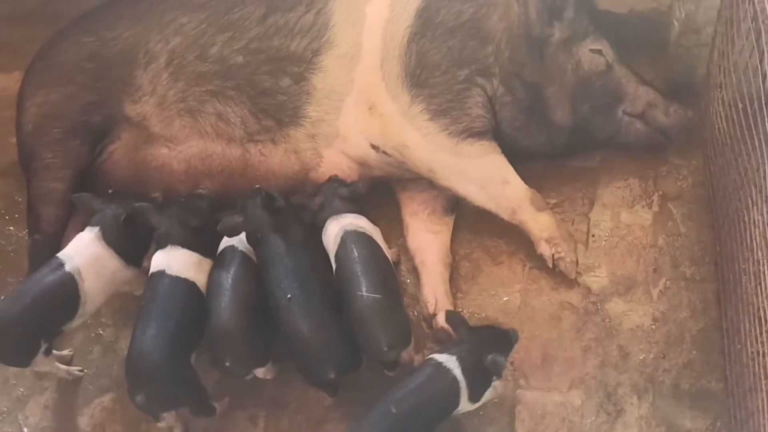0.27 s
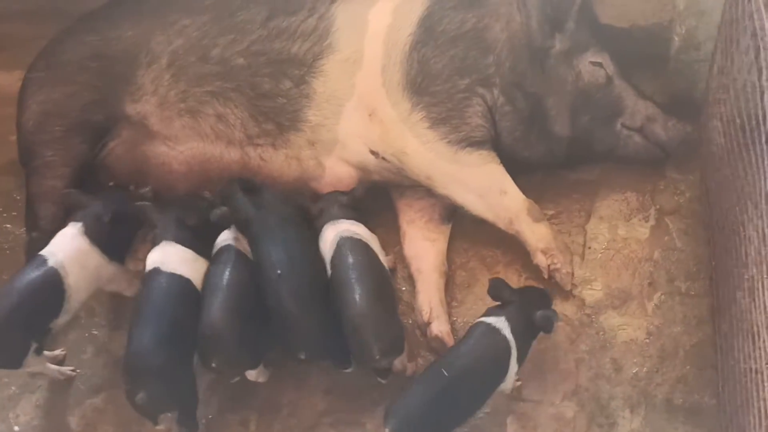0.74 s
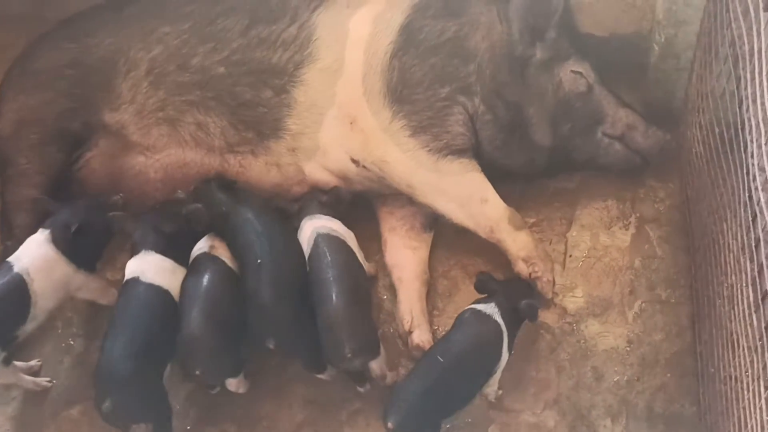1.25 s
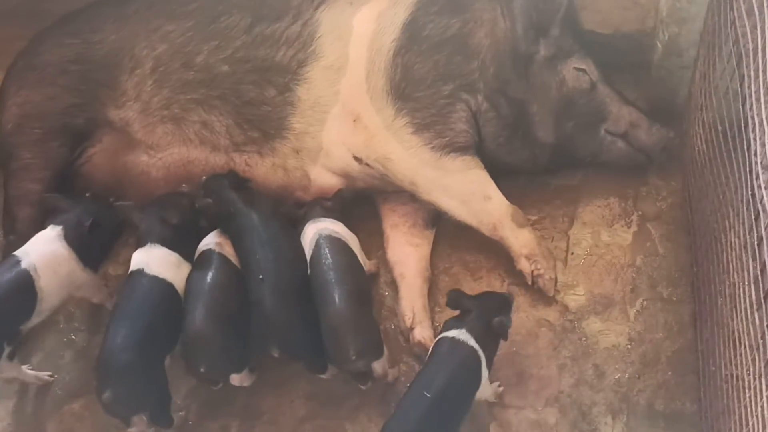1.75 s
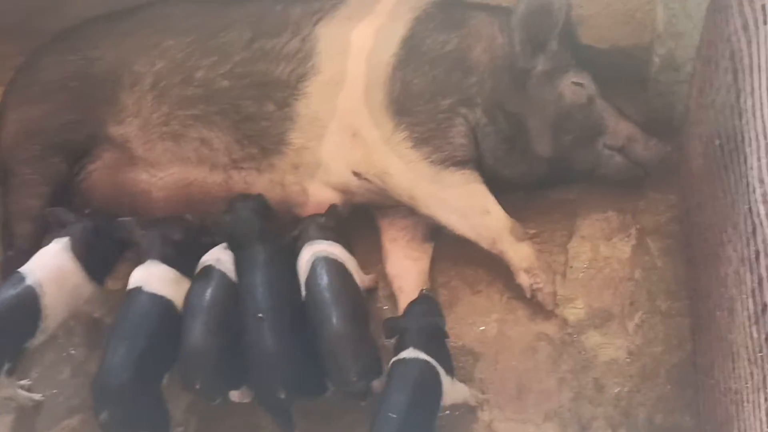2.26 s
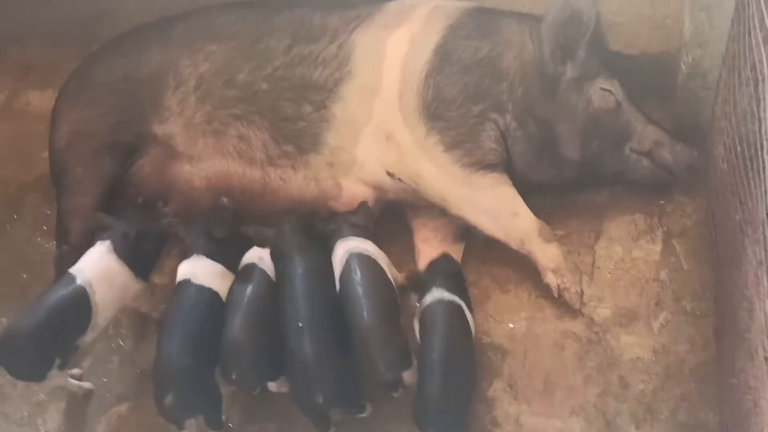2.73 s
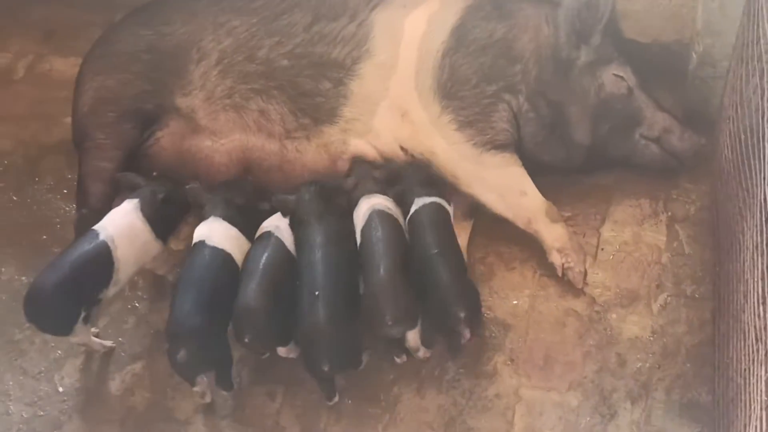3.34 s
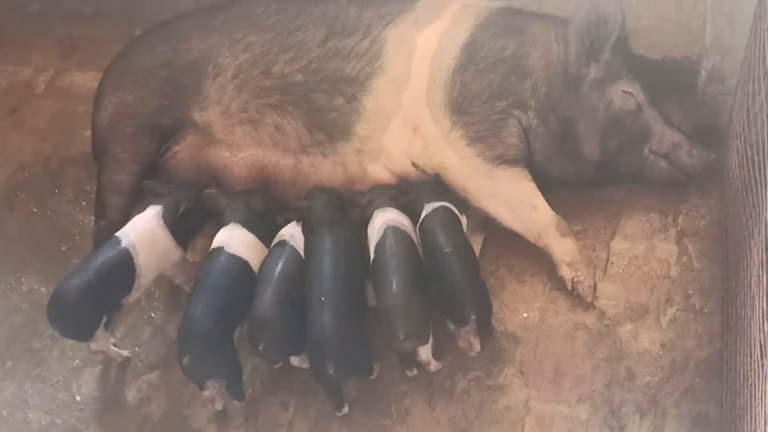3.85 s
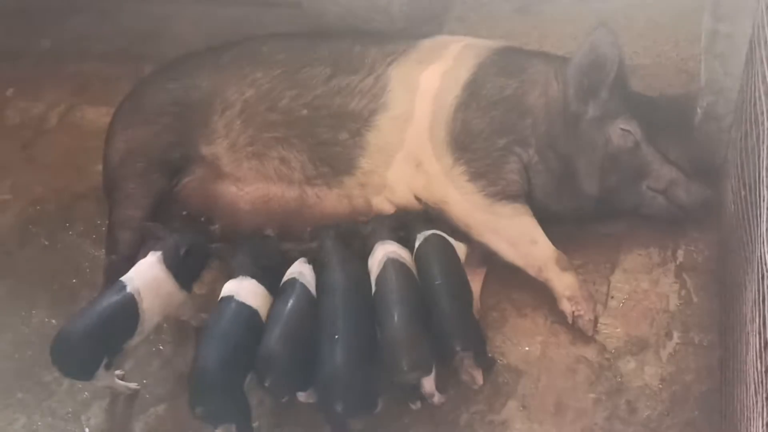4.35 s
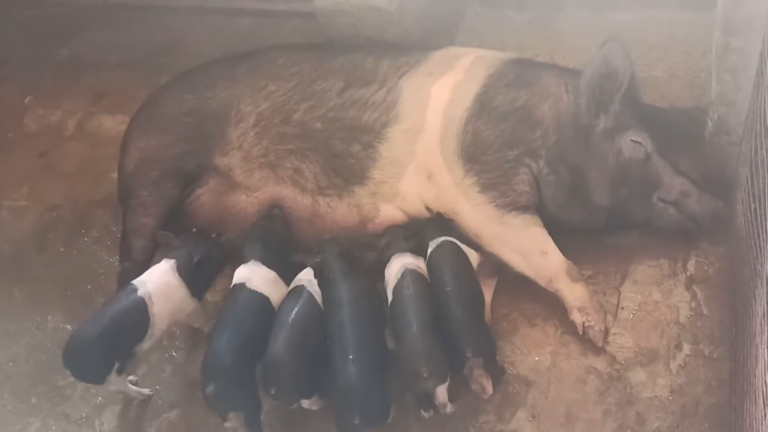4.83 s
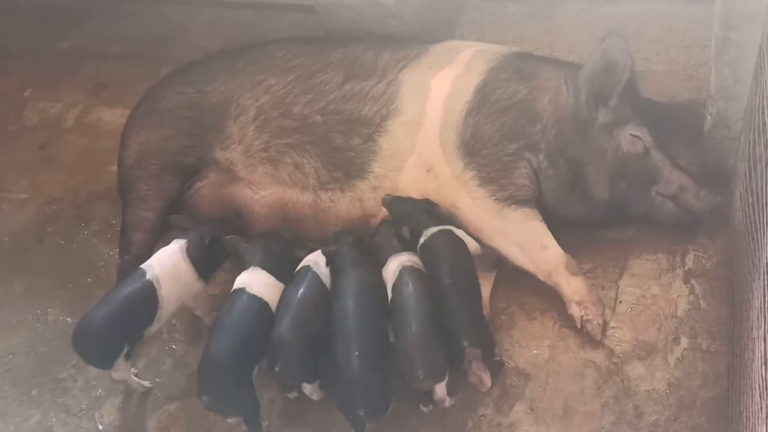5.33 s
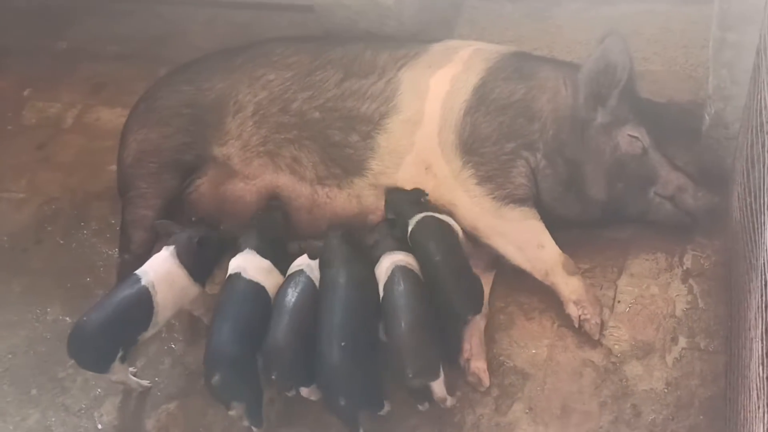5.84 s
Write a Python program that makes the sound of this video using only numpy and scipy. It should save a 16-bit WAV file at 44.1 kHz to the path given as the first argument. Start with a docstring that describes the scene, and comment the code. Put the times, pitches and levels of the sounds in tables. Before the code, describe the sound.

Close, single-channel sound of a big pig grunting in a small, reflective pen. Each loud grunt is a brief string of slow, wet throat slaps with mouth clicks. In between she rumbles through a nearly shut mouth, with hissing snout air, one quick snort and a long hum carrying a thin tone. Beneath lie faint sucking, ticking, body rustle and still, low barn air.

```python
"""A sow nurses her piglets in a hard-walled pen, where the litter fizzes and shuffles in still air throughout.
She starts with a soft hum; a hoarse moan leads into a loud grunt at 0.8 s, a slow rattle of throat slaps.
A faint grunt, short knocks and one flapping snort at 1.4 s follow, then a second loud grunt at 2.8 s.
On her loudest murmur, a nasal hum from 3.3 s, rides a thin, nearly steady tone; loud grunts return at 4.4
and 5.8 s. Between grunts she rumbles through nose and mouth, air hisses in her snout and the walls echo her."""
import sys
import numpy as np
from scipy import signal
from scipy.fft import rfft, irfft, next_fast_len
from scipy.io import wavfile
from scipy.ndimage import uniform_filter1d, minimum_filter1d, map_coordinates

SR = 44100
rng = np.random.default_rng(int(sys.argv[2]) if len(sys.argv) > 2 else 0)


def file_out(sig):
    """Save sig as 16-bit WAV at sys.argv[1]."""
    # one column per channel
    cols = np.atleast_2d(sig).T
    # limit, then scale
    lim = np.clip(cols, -1, 1)
    pcm = np.round(lim * 32767).astype(np.int16)
    wavfile.write(sys.argv[1], SR, pcm)


N = 268172
TIME = np.arange(N) / SR

# In resonance tables the width is that at half amplitude.
# Open grunts: first slap t/s, first period/s, period change per slap/s, level before make-up/dB, time to crest/s,
# crest to -6 dB/s, jaw gain/dB, tongue gain/dB, spray/dB, dull above f/Hz
GRUNT_EVENTS = [(0.822, 0.03, -0.0065, -13, 0.02, 0.024, 6, -2.5, 1.5, 9200),
                (1.0536, 0.029, 0.001, -27.5, 0.0059, 0.034, 0.5, -5.5, 2, 2970),
                (2.844, 0.031, 0.0005, -15, 0.03, 0.046, 5, -0.5, -0.5, 8420),
                (4.4321, 0.034, -0.0076, -16.5, 0.034, 0.033, 3, -7, -2, 8800),
                (5.7812, 0.0324, -0.0018, -14.5, 0.054, 0.057, -4.5, -1, -1.5, 7520)]
SLAP_MAKEUP_DB = 36.5  # offsets the spread of a slap over the throat's resonances
# Open throat: f/Hz, width/Hz, level/dB
THROAT_MODES = [(119, 75, -5), (254, 52, 2), (348.8, 83, 1), (532, 160, -3.5), (625, 136, -4),
                (1093, 140, -14), (1211, 130, -7.5), (1525, 120, -14.5), (2180, 190, -14),
                (2430, 680, -26.5), (3580, 1020, -20), (4050, 730, -61), (7070, 920, -28)]
THROAT_SHIFT = 0.032  # random spread of each resonance from slap to slap (share)
JAW_HZ = 627  # resonance set by the jaw opening
TONGUE_HZ, TONGUE_WIDTH_HZ = 1130, 660  # band damped by the tongue
FIRST_DULL_HZ = 4370  # treble limit of a first slap, with the mouth barely open
BULGE_S, BULGE_DB = .0037, -8.5  # soft low push of the folds: its lead over the slap and its level
# Colours of the three parts of a slap: f/Hz, level/dB
BULGE_COLOUR = [(400, 3.0), (700, -4.5), (1400, -60), (4000, -80)]
THUMP_COLOUR = [(600, 4.0), (1200, 0.5), (2200, -11.0), (4000, -48), (7000, -6)]
SPRAY_COLOUR = [(300, -10.5), (1000, 6.0), (2500, 8.5), (7500, -1.5)]
WALL_GLINT_S, WALL_GLINT_DB = .0205, -15.5  # bright wall echo of each slap: delay and level
# Bright wall echo: f/Hz, width/Hz, level/dB
WALL_GLINT_MODES = [(3840, 710, 2)]
RASP_DB, RASP_LAG_S = -24.5, 0.0028  # air under a grunt, trailing its effort
# Throat air: f/Hz, level/dB
RASP_COLOUR = [(300, -28), (900, 4), (1400, 7.5), (2400, -7.5), (4000, -8.5), (5200, -13.5), (8000, -29.5)]
# Early returns of each slap from floor and near wall: delay/s, level/dB
NEAR_BOUNCES = [(.0029, -20), (.0078, -32)]

# Wet clicks in the open mouth: t/s, peak before treble loss/dB, f/Hz
CLICK_EVENTS = [(0.856, -22, 6530), (1.061, -41.5, 6550), (2.8474, -31, 6900), (2.877, -31, 6600),
                (2.9085, -34, 6540), (2.9392, -31, 6370), (4.468, -34, 6870), (4.5006, -35.5, 5930),
                (5.8153, -36.5, 6580), (5.8457, -35.5, 6370), (5.901, -33.5, 6300)]
CLICK_WIDTH_HZ, CLICK_TOP_HZ = 830, 7940  # the mouth lets out little above the top

# Closed-mouth grunts: start t/s, rise/s, length/s, crest level before trims/dB, fade while held/dB,
# mouth over nose/dB, snout air over nose/dB, crest pitch f/Hz, voiced share at crest (0-1), lips parted (0-1)
MURMUR_EVENTS = [(0.527, 0.23, 0.34, -37, -3.5, -13, -17, 64.85, 0.7, 0.57),
                 (0.966, 0.1, 0.26, -47, 5, -0.5, -5.5, 66.38, 0.44, 0.6),
                 (1.615, 0.064, 0.33, -40, 15, -13, -9, 67.86, 0.4, 0.74),
                 (2.23, 0.23, 0.45, -54.5, 9, -10.5, -16, 61.27, 0.28, 0.3),
                 (2.71, 0.035, 0.088, -32.5, 6.5, -7, -29, 64.13, 0.99, 0.27),
                 (2.786, 0.077, 0.084, -37.5, 0.5, -0.5, -2.5, 63.49, 0.5, 0.8),
                 (2.977, 0.041, 0.23, -40.5, 4.5, -3.5, -7.5, 62.12, 0.1, 0.18),
                 (3.155, 0.022, 0.047, -36.5, 7.5, -20, -37, 62.35, 0.5, 0.17),
                 (3.272, .075, .37, -18.5, 18.5, -21.5, -20.5, 65, 0.9, .3),
                 (3.628, 0.09, 0.27, -37, -0.5, -11.5, -26, 59.5, 0.1, 0.15),
                 (3.922, 0.044, 0.28, -43.5, 3.5, -10, -8.5, 60.88, 0.6, 0.2),
                 (4.323, 0.012, 0.084, -51.5, 3, -1.5, 2.5, 61.28, 0.34, 0.3),
                 (4.404, 0.028, 0.036, -40.5, 0.5, 0, -11, 60.78, 0.1, 0),
                 (4.622, 0.15, 0.25, -42, 3, -9, -12.5, 61.21, 0.46, 0),
                 (4.821, 0.041, 0.045, -36, 0.5, -25, -34, 60.87, 0.98, 0),
                 (4.945, 0.047, 0.12, -32.5, 0, -8.5, -14.5, 51.78, 0.68, 0.74),
                 (5.014, 0.054, 0.18, -24, 13, -16.5, -16, 52.88, 0.73, 0.9),
                 (5.178, 0.039, 0.39, -39, 10, -12, -15, 60.18, 0.26, 0.24),
                 (5.672, 0.015, 0.097, -35.5, 4, -8.5, -14.5, 61.03, 0, 0.14),
                 (5.757, 0.022, 0.037, -34.5, 0, -2, -18, 60.87, 0.5, 0.8),
                 (5.958, 0.047, .13, -44, 6.5, 5.5, -5, 63.46, 0.09, 0)]
NOSE_DB, MOUTH_DB, AIR_DB, HUM_DB = -2.5, -4.5, -4, -5  # trims
SWELL_SHAPE = 0.56  # above .5, a push starts gently
FADE_SHAPE = 0.703  # below 1, effort falls fastest just after the crest
RELEASE_DB_PER_S = 259.5  # how fast a push dies once released
NOSE_LAG, AIR_LEAD = 1.1, 0.65  # powers of the swell: voice builds later than air
MOUTH_FOLLOWS, AIR_FOLLOWS = 0.62, 1.3  # dB lost per dB of fading effort
VOICE_FOLLOWS = .15  # power of effort that thins the voiced share
PITCH_PER_DB = .0012  # log pitch per dB of effort
PITCH_WAVER, HUM_WAVER_DB = .016, 1.8
TREMOR_DB, TREMOR_HZ = 1.4, 22
# Hum partials: multiple of the pitch, level/dB
HUM_PARTIALS = [(2, -7), (3, 1.5), (4, 1), (5, -6.5), (6, -21)]
# Airways: f/Hz, width/Hz, level/dB
NOSE_MODES = [(145.5, 16.6, -4.5), (180.9, 30, 1), (243, 69, -3), (336.5, 45, -7), (416, 90, -18.5)]
MOUTH_MODES = [(469, 167, 9.5), (640, 580, -1.5), (714, 69, -8)]
PARTED_LIP_MODES = [(602, 200, 1), (716, 170, -0.5)]
SNOUT_MODES = [(850, 790, 2.5), (1410, 450, -6), (1700, 940, 5.5), (2280, 530, -5.5), (2920, 660, 1.5),
               (3760, 1500, -4), (4730, 1200, -8), (6700, 2000, -17)]
NOSTRIL_MODES = [(1470, 400, -2.5), (1700, 110, 2), (2595, 410, 5)]
# Chest wall: f/Hz, width/Hz, level/dB
CHEST_MODES = [(44.8, 3.2, -9), (77.5, 53, -7), (131.7, 23, -5.5)]
CHEST_DB, CHEST_AT_DB, CHEST_FOLLOWS = -48, -40, 0.81  # rumble at this nose level; it grows less than the voice
CHEST_CLEAN_DB = -7  # a clean hum shakes the chest less

# A hoarse moan before the first grunt, then a thin, nearly steady tone on the loudest murmur, each a list of
# points: t/s, f/Hz, level/dB, overtone level/dB
TONE_PATHS = [
    [(.56, 359.4, -56.5, -76), (0.611, 385.7, -47.5, -66), (0.659, 405, -45, -66), (.72, 400.5, -54, -54),
     (.8, 382, -51, -50)],
    [(3.49, 336, -54, -71), (3.54, 340.2, -39, -65), (3.61, 336.3, -45, -65), (3.72, 334.2, -52.5, -74)],
]
# Nostril air: start t/s, rise/s, length/s, whistle level/dB, hiss over whistle/dB
WHEEZE_EVENTS = [(0.546, 0.045, 0.36, -55, 2), (1.035, 0.027, 0.1, -51, -6), (3.265, 0.071, 0.075, -52, 11),
                 (3.528, 0.35, 0.41, -53.5, 4), (4.983, 0.06, 0.077, -56, 2), (5.254, 0.19, 0.4, -72, 8)]
WHEEZE_FADE_DB = 2.5  # sag within a wheeze
WHEEZE_GRAIN_DB, WHEEZE_GRAIN_HZ = 4, 119.6  # moisture breaks up the hiss
# Snort: t/s, throat level before trim/dB, rasp level before trim/dB
SNORT_CURVE = [(1.365, -51, -53), (1.385, -42.5, -54), (1.42, -41.5, -59), (1.455, -38, -36.5),
               (1.49, -39.5, -33), (1.56, -46, -50), (1.64, -54, -45.5)]
# Soft palate and throat: f/Hz, width/Hz, level/dB
PALATE_MODES = [(141, 140, -2.5), (347, 47, 8), (451.7, 180, -2.5), (670, 160, 2.5), (1226, 49, -5),
                (1880, 310, -10), (2860, 430, -16), (3870, 1200, -45)]
# Short throat slaps, knocks and smacks: t/s, peak level/dB, f/Hz, width/Hz
KNOCK_EVENTS = [(1.028, -27.5, 483, 262), (1.055, -33.5, 2370, 645), (1.087, -38, 2520, 700),
                (1.281, -42.5, 3130, 1816), (1.367, -36, 1820, 600), (1.402, -38, 1580, 900),
                (1.4428, -32, 2012, 700), (2.04, -43, 3010, 380), (2.322, -45, 4260, 3000),
                (2.722, -45, 613, 500), (3.0435, -38, 5137, 2030), (4.3313, -57, 1528, 1516),
                (4.5648, -51.5, 1596, 880), (5.683, -36.5, 1500, 1810)]

# Busyness of the litter: t/s, level before LITTER_DB/dB
LITTER_CURVE = [(0.0, -77), (0.66, -78), (0.81, -67), (1.29, -71.5), (2.12, -77.5), (3.12, -72),
                (4.01, -68.5), (4.21, -76), (5.27, -68.5), (5.62, -67), (5.75, -73.5), (6.08, -66.5)]
LITTER_DB, RESTLESS_DB, RESTLESS_HZ = 10.5, .9, 6.7  # lift, and its restless wavering
# Piglets shove or scuff the floor: t/s, fall/s, level/dB
SHUFFLE_EVENTS = [(0.624, 0.093, -50.5), (1.057, 0.24, -52), (1.376, 0.16, -56), (1.587, 0.18, -55),
                  (2.161, 0.47, -61.5), (2.72, 0.096, -51), (2.859, 0.21, -55), (3.037, 0.15, -53.5),
                  (3.21, 0.087, -54), (3.612, 0.2, -53.5), (4.071, 0.12, -55.5), (5.166, 0.37, -59.5)]
SHUFFLE_RISE = 0.23  # rise as a share of the fall time
# Litter fizz: f/Hz, level/dB
FIZZ_COLOUR = [(700, 1), (2000, 0), (4800, 8), (7000, 4), (8500, -0.5), (10800, -8.5), (13700, 4),
               (15500, -5)]
# Bodies rubbing on sow and floor: f/Hz, level/dB
RUSTLE_COLOUR = [(200, -19), (450, 6.5), (900, 0.5), (1600, -4.5), (2700, -7), (5000, -15.5)]
RUSTLE_DB = -0.5  # relative to the busy fizz
# Wet sucks: t/s, level/dB, time to fall 60 dB/s
SUCK_EVENTS = [(.637, -46, .15), (1.375, -46.5, 0.96), (1.43, -54, 0.17), (2.725, -84, .2),
               (4.965, -46, 0.27), (5.784, -39, 0.096)]
# Sucked air: f/Hz, level/dB
SUCK_SPECTRUM = [(2000, -12), (5000, -17), (10000, -6.5), (13800, 1.5), (15500, 8)]

# Still barn air: f/Hz, level/dB
BARN_COLOUR = [(15, -25), (25, 6.5), (136, -5), (173, -0.5), (204, 1.5), (274, -5.5), (600, -9.5),
               (1050, -17), (1660, -19.5), (2700, -18.5), (5010, -25.5), (15500, -64)]
# Faint far tone: t/s, level/dB
WHINE_CURVE = [(0, -73), (.3, -71.5), (1.9, -67), (2.6, -71.5), (3.0, -85)]
# Pen reverberation: f/Hz, time to fall 60 dB/s
PEN_DECAY = [(100, 1), (260, 0.5), (700, 0.37), (1800, 0.53), (4800, 0.39), (12000, 0.19)]
LIMIT_DB, LIMIT_S = -8.8, .004
TOP_HZ = 15600  # band limit


def grunts(count=5):
    """Throat slaps swell and fade, each with a bright wall echo; harder ones throw more spray over rasping air."""
    k = np.arange(count)
    slaps, glint, flow = np.zeros((3, N))
    for start, period, change, db, crest, half, jaw_db, tongue_db, spray_db, dull_hz in GRUNT_EVENTS:

        def effort_db(t):
            return -6 * ((t - start - crest) / half) ** 2

        def mouth_gain(hz, edge_hz):
            jaw = jaw_db * np.exp(-((hz - JAW_HZ) / 90) ** 2)
            tongue = tongue_db * np.exp(-((hz - TONGUE_HZ) / TONGUE_WIDTH_HZ) ** 2)
            return amp(jaw + tongue) / (1 + (hz / edge_hz) ** 8)

        for t in start + k * period + change * k * (k - 1) / 2:
            edge_hz = dull_hz if t > start else min(dull_hz, FIRST_DULL_HZ)
            mouth = lambda hz: mouth_gain(hz, edge_hz)
            size = amp(db + effort_db(t))
            add(slaps, t - BULGE_S, size * slap(spray_db + 0.14 * effort_db(t), mouth))
            echo = tract(burst(decay=0.001, rise=0.00046), WALL_GLINT_MODES)
            add(glint, t + WALL_GLINT_S, size * shaped(echo / np.abs(echo).max(), mouth))
        flow += amp(db + 2.1 * effort_db(TIME - RASP_LAG_S))
    near = slaps + sum(amp(db) * np.interp(TIME - delay, TIME, slaps, left=0) for delay, db in NEAR_BOUNCES)
    grain = amp(4 * wobble(250))
    rasp = amp(RASP_DB) * flow * unit(coloured(rng.standard_normal(N) * grain, RASP_COLOUR))
    throat = pen(amp(SLAP_MAKEUP_DB) * near + rasp, wet_db=-4.0, wall_db=-9.5)
    return throat + pen(amp(WALL_GLINT_DB) * glint, wet_db=-5, wall_db=-8)


def slap(spray_db, mouth):
    """One throat beat: a low bulge, a thump and a wet spray, in resonances that shift from beat to beat."""
    impulse = signal.unit_impulse(SR // 10)
    bulge = amp(BULGE_DB) * coloured(impulse, BULGE_COLOUR)
    thump = coloured(impulse, THUMP_COLOUR)
    spray = amp(spray_db) * coloured(burst(decay=.005, rise=.0015), SPRAY_COLOUR)
    voice = bulge + np.pad(thump + spray, (round(BULGE_S * SR), 0))[:len(bulge)]
    modes = [(hz * np.exp(THROAT_SHIFT * rng.standard_normal()), width, db) for hz, width, db in THROAT_MODES]
    return tract(shaped(voice, mouth), modes)


def clicks():
    """Wet tissue snaps apart in her mouth: a tiny burst rings a bright resonance."""
    out = np.zeros(N)
    for s, db, hz in CLICK_EVENTS:
        snap = tract(burst(decay=0.00076, rise=0.00018), [(hz, CLICK_WIDTH_HZ, 0)])
        add(out, s, amp(db) * snap / np.abs(snap).max())
    return pen(shaped(out, lambda hz: 1 / (1 + (hz / CLICK_TOP_HZ) ** 20)), wet_db=-6, wall_db=-7)


def murmurs():
    """With her mouth nearly shut she hums and rumbles through her nose; the same beats chop the snout air."""
    nose_gain, mouth_gain, air_gain, pitch, voiced, parted = murmur_controls()
    pitch_hz = pitch * np.exp(PITCH_WAVER * wobble(30))
    phase = 2 * np.pi * np.cumsum(pitch_hz) / SR
    hum = unit(sum(amp(db + HUM_WAVER_DB * wobble(22)) * np.cos(k * phase) for k, db in HUM_PARTIALS))
    beats = flutter(pitch_hz, jitter=0.1887, scatter_db=2.0)
    rumble = beats + 0.72 * puffs(beats, decay=0.021, rise=0.0024)
    nose = nose_gain * np.sqrt(1 - voiced ** 2) * unit(tract(rumble, NOSE_MODES))

    chest_gain = (nose_gain / amp(CHEST_AT_DB)) ** CHEST_FOLLOWS * amp(CHEST_CLEAN_DB * voiced ** 2)
    chest = chest_gain * unit(tract(rumble, CHEST_MODES))

    chopped = .5 * beats + puffs(beats, decay=0.021, rise=0.0014)
    closed_lips = unit(tract(chopped, MOUTH_MODES))
    open_lips = unit(tract(chopped, PARTED_LIP_MODES))
    mouth = mouth_gain * unit((1 - parted) * closed_lips + parted * open_lips)

    hiss = puffs(beats, decay=0.016, rise=0.0055)
    # a very faint nostril colour lies under the snout hiss
    air = air_gain * unit(unit(tract(hiss, SNOUT_MODES)) + amp(-41.0) * unit(tract(hiss, NOSTRIL_MODES)))

    voice = amp(NOSE_DB) * nose + amp(CHEST_DB) * chest + amp(MOUTH_DB) * mouth + amp(AIR_DB) * air
    tremor = amp(TREMOR_DB * wobble(TREMOR_HZ))
    clean = amp(HUM_DB) * nose_gain * voiced * hum
    return pen(tremor * voice, wet_db=-8.5, wall_db=-16.0) + pen(tremor * clean, wet_db=-8.5, wall_db=-25)


def murmur_controls():
    """Effort drives nose, mouth and snout levels, the pitch and the hummed share; overlaps blend by power."""
    nose, mouth, air, pitch, voiced, parted = np.zeros((6, N))
    for start, rise, length, db, fade_db, mouth_db, air_db, hz, share, lips in MURMUR_EVENTS:
        gate, effort = push(start, rise, length, fade_db)
        power = (amp(db) * gate ** NOSE_LAG * effort) ** 2 + 1e-16
        nose += power
        mouth += (amp(db + mouth_db) * gate * effort ** MOUTH_FOLLOWS) ** 2
        air += (amp(db + air_db) * gate ** AIR_LEAD * effort ** AIR_FOLLOWS) ** 2
        pitch += power * hz * np.exp(PITCH_PER_DB * 20 * np.log10(effort))
        voiced += power * share * effort ** VOICE_FOLLOWS
        parted += power * lips
    voiced, parted = np.clip(voiced / nose, 0, 1), np.clip(parted / nose, 0, 1)
    return np.sqrt(nose), np.sqrt(mouth), np.sqrt(air), pitch / nose, voiced, parted


def push(start, rise, length, fade_db):
    """One push of air: a gate that swells and is released, and the effort that fades while it is held."""
    t = TIME - start
    held = np.clip((t - rise) / max(length - rise, .005), 0, 1)
    gate = swell(start, rise) ** SWELL_SHAPE * amp(-RELEASE_DB_PER_S * np.clip(t - length, 0, 1))
    return gate, amp(-fade_db * held ** FADE_SHAPE)


def throat_tone(rows):
    """The throat sings a tone and its octave along a pitch path, with fast wavering of pitch and level."""
    s, pitch, db, overtone_db = np.transpose(rows)
    pitch_hz = np.interp(TIME, s, pitch) * np.exp(0.0297 * wobble(70))
    phase = 2 * np.pi * np.cumsum(pitch_hz) / SR
    low, high = gains(np.transpose([s, db, overtone_db]))
    return (low * unit(np.sin(phase)) + high * unit(np.sin(2 * phase))) * amp(2.7 * wobble(58))


def wheezes():
    """Unvoiced air half whistles in the nostril resonances, with a moist, grainy hiss from the snout."""
    whistle = unit(tract(rng.standard_normal(N), NOSTRIL_MODES))
    grain = amp(WHEEZE_GRAIN_DB * wobble(WHEEZE_GRAIN_HZ))
    hiss = unit(tract(rng.standard_normal(N) * grain, SNOUT_MODES))
    air = np.zeros(N)
    for start, rise, length, db, hiss_db in WHEEZE_EVENTS:
        gate, effort = push(start, rise, length, WHEEZE_FADE_DB)
        air += amp(db) * gate * effort * (whistle + amp(hiss_db) * hiss)
    return pen(air, wet_db=-9.0, wall_db=-9.5)


def snort():
    """The soft palate flaps fast and unevenly, letting out puffs that ring throat and snout."""
    throat_gain, rasp_gain = gains(SNORT_CURVE)
    beats = flutter(rate_hz=130, jitter=0.25, scatter_db=2.5)
    flaps = .5 * beats + puffs(beats, decay=0.0045, rise=0.0011)
    voice = throat_gain * unit(tract(flaps, PALATE_MODES))
    rasp = rasp_gain * unit(tract(puffs(beats, decay=0.014, rise=0.0013), SNOUT_MODES))
    return pen(amp(-0.5) * voice + amp(-7.0) * rasp, wet_db=-4.5)


def knocks():
    """Short throat slaps, knocks and smacks: each is a brief burst ringing a resonance."""
    out = np.zeros(N)
    for s, db, hz, width_hz in KNOCK_EVENTS:
        knock = tract(puffs(spikes([s], [1]), decay=0.0085, rise=0.00055), [(hz, width_hz, 0)])
        out += amp(db) * knock / np.abs(knock).max()
    return pen(out, wet_db=-25.0)


def litter():
    """Sucking and shuffling make a flickering fizz strewn with ticks, over body rustle and longer wet sucks."""
    ticks = rng.standard_normal(N) * amp(1.34 * wobble(45))
    ticks += amp(-7) * spikes(rng.uniform(0, N / SR, size=200), rng.standard_normal(size=200))
    busy = gains(LITTER_CURVE)[0] * amp(LITTER_DB + RESTLESS_DB * wobble(RESTLESS_HZ))
    scuffs = np.zeros(N)
    for s, fall, db in SHUFFLE_EVENTS:
        rise = SHUFFLE_RISE * fall
        scuffs += amp(db) * swell(s, rise) * (1 - swell(s + rise, fall))
    fizz = np.hypot(busy, scuffs) * unit(coloured(ticks, FIZZ_COLOUR))
    rustle = amp(RUSTLE_DB) * busy * unit(coloured(rng.standard_normal(N), RUSTLE_COLOUR))
    draw = sum(amp(db - 60 * np.abs(TIME - s) / decay) * (TIME >= s) for s, db, decay in SUCK_EVENTS)
    wet_air = unit(coloured(rng.standard_normal(N) * amp(1.2 * wobble(200)), SUCK_SPECTRUM))
    return fizz + rustle + draw * wet_air


def barn():
    """Low, slightly wavering air noise with a faint whine of unsteady pitch."""
    air = unit(coloured(rng.standard_normal(N), BARN_COLOUR)) * amp(-57.5 + wobble(8.0))
    whine_hz = 1716 + 7 * wobble(40.2)
    whine = gains(WHINE_CURVE)[0] * np.sin(2 * np.pi * np.cumsum(whine_hz) / SR)
    return air + whine


def pen(x, wet_db, wall_db=-10, wall_delay=.0183, build=0.0011):
    """The far wall returns one clear echo, and a diffuse tail dies away at its own rate in each band."""
    hz, t, z = signal.stft(rng.standard_normal(SR), SR, nperseg=256)
    decay = amp(-60 * t / along(PEN_DECAY, hz)[:, None]) * (1 - np.exp(-t / build))
    tail = signal.istft(z * decay, SR, nperseg=256)[1]
    echo = np.interp(TIME - wall_delay, TIME, x, left=0)
    diffuse = signal.fftconvolve(x, tail / np.linalg.norm(tail))[:N]
    return x + amp(wall_db) * echo + amp(wet_db) * diffuse


def flutter(rate_hz, jitter, scatter_db):
    """Uneven beats of slack tissue: impulses scattered in time and strength."""
    cycles = np.cumsum(rate_hz * np.exp(.04 * wobble(6))) / SR
    times = TIME[1:][np.diff(np.floor(cycles)) > 0]
    chance = rng.standard_normal((len(times), 2))
    return spikes(times + jitter / np.mean(rate_hz) * chance[:, 0], amp(scatter_db * chance[:, 1]))


def puffs(beats, decay, rise):
    """Every beat lets out a burst of turbulence scaled by its strength."""
    t = np.arange(SR // 2) / SR
    envelope = np.exp(-t / decay) * (1 - np.exp(-t / rise))
    return signal.fftconvolve(beats, envelope / np.linalg.norm(envelope))[:N] * rng.standard_normal(N)


def burst(decay, rise):
    """One short burst of turbulence of energy 1."""
    t = np.arange(SR // 10) / SR
    noise = np.exp(-t / decay) * (1 - np.exp(-t / rise)) * rng.standard_normal(len(t))
    return noise / np.linalg.norm(noise)


def tract(x, modes):
    """Steep-sided resonances of an airway, summed by power."""
    def gain(hz):
        return np.sqrt(sum((amp(db) / (1 + ((hz * hz - c * c) / (w * hz + 1)) ** 2)) ** 2 for c, w, db in modes))
    return shaped(x, gain)


def coloured(x, spectrum):
    """Filter by (f/Hz, level/dB) points."""
    return shaped(x, lambda hz: amp(along(spectrum, hz)))


def shaped(x, gain):
    """Causal minimum-phase filter with the given gain over frequency."""
    m = 2 * next_fast_len(len(x) // 2 + SR // 8, real=True)
    cepstrum = irfft(np.log(np.maximum(gain(np.fft.rfftfreq(m, 1 / SR)), 1e-6)))
    # folding the cepstrum to positive time makes the filter causal
    cepstrum[1:m // 2] *= 2
    cepstrum[m // 2 + 1:] = 0
    return irfft(rfft(x, m) * np.exp(rfft(cepstrum)))[:len(x)]


def swell(start, rise):
    """A smooth attack from 0 to 1."""
    return np.sin(np.pi / 2 * np.clip((TIME - start) / rise, 0, 1)) ** 2


def gains(rows, fade=0.02):
    """A gain per sample for each dB column, fading out beyond the ends."""
    s, *cols = np.transpose(rows)
    gate = np.clip(1 + np.minimum(TIME - s[0], s[-1] - TIME) / fade, 0, 1)
    return np.array([gate * amp(np.interp(TIME, s, c)) for c in cols])


def wobble(rate):
    """A smooth random curve, rate knots a second."""
    return map_coordinates(rng.standard_normal(4096), [TIME * rate], mode="wrap")


def spikes(times, sizes):
    """Impulses at the given times."""
    return np.bincount(np.clip(np.round(np.asarray(times) * SR), 0, N).astype(int), sizes, N + 1)[:N]


def add(out, start, sound):
    """Mix a short sound in at its start time."""
    part = out[round(start * SR):][:len(sound)]
    part += sound[:len(part)]


def along(points, hz):
    """Interpolate (f/Hz, value) points on a log axis."""
    f, v = np.transpose(points)
    return np.interp(np.log(hz + 1), np.log(f + 1), v)


def amp(db):
    """Decibels to gain."""
    return 10 ** (np.asarray(db) / 20)


def unit(x):
    """Scale to rms 1."""
    return x / np.sqrt(np.mean(x ** 2) + 1e-20)


def scene():
    """The sow, her litter and the barn air, mixed to one channel."""
    tones = pen(sum(throat_tone(rows) for rows in TONE_PATHS), wet_db=-11.5)
    sow = grunts() + clicks() + murmurs() + tones + wheezes() + snort()
    return (sow + knocks() + litter() + barn())[None]


def record(dry):
    """A limiter holds down the loudest peaks; the deepest bass and all above the band limit are removed."""
    span = round(LIMIT_S * SR)
    needed = 1 / np.maximum(np.abs(dry) / amp(LIMIT_DB), 1)
    held = dry * uniform_filter1d(minimum_filter1d(needed, 2 * span), span)
    m = next_fast_len(N + SR // 2)
    hz = np.fft.rfftfreq(m, 1 / SR)
    bass_cut = 1 - 1 / (1 + (hz / 33.8) ** 8)
    return irfft(rfft(held, m) * bass_cut * (hz < TOP_HZ), m)[..., :N]


dry = scene()
out = record(dry)
file_out(out)
```